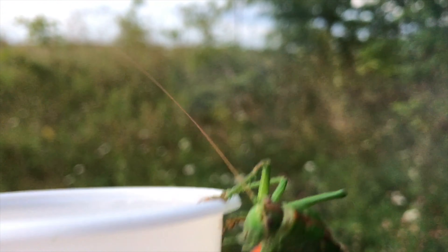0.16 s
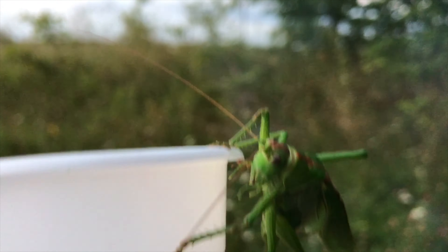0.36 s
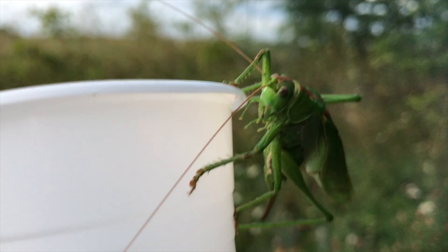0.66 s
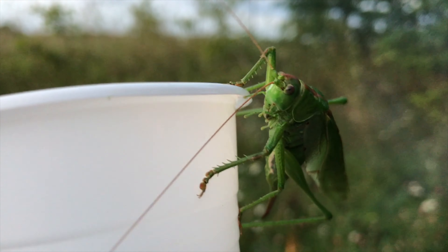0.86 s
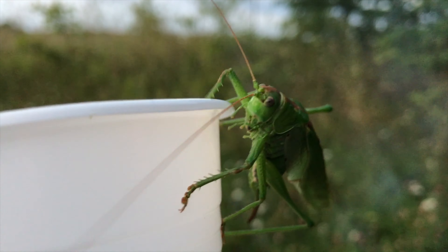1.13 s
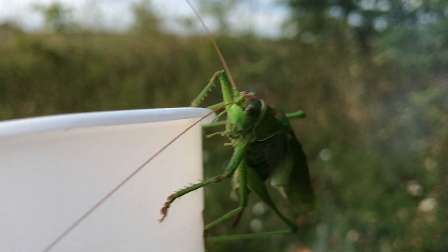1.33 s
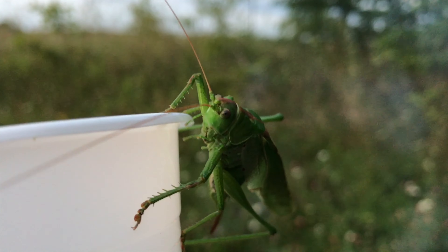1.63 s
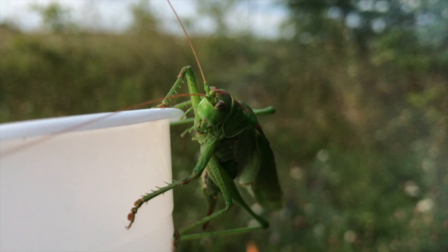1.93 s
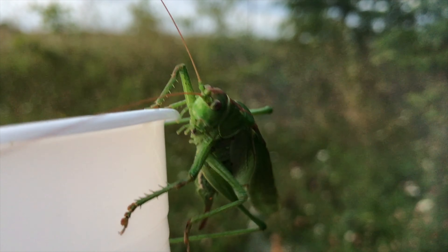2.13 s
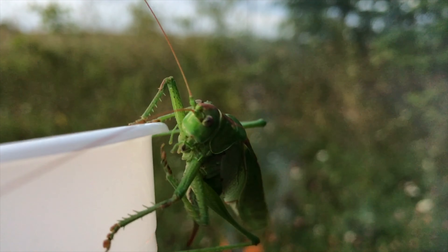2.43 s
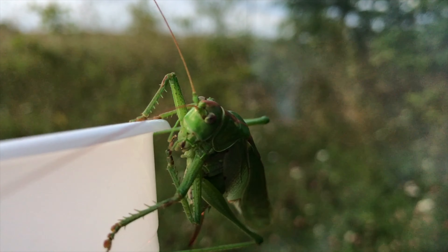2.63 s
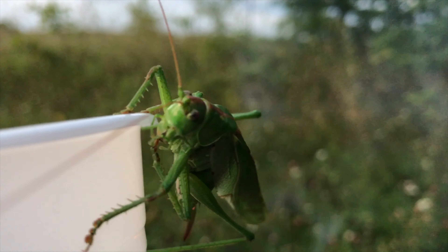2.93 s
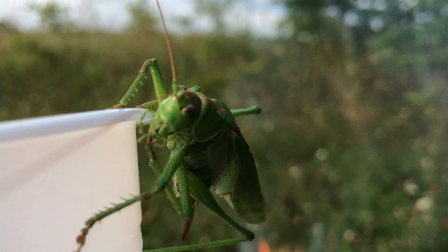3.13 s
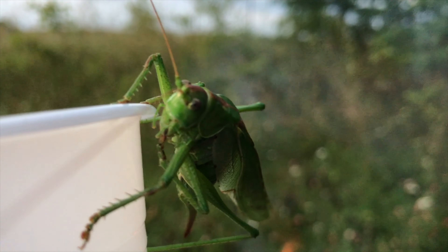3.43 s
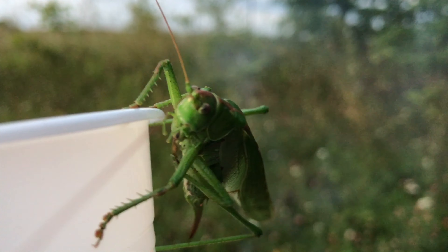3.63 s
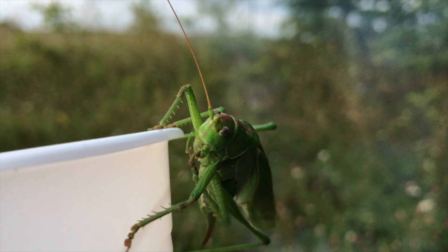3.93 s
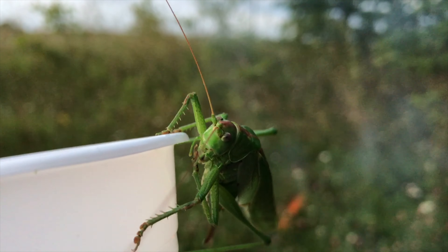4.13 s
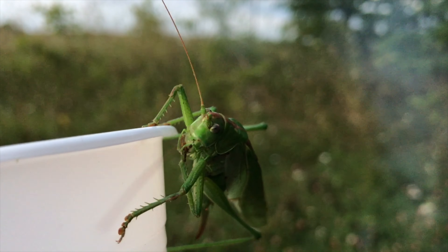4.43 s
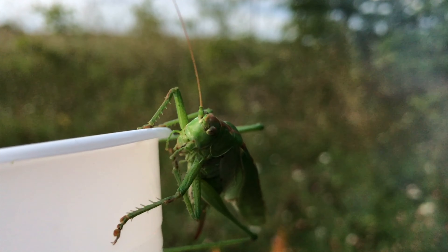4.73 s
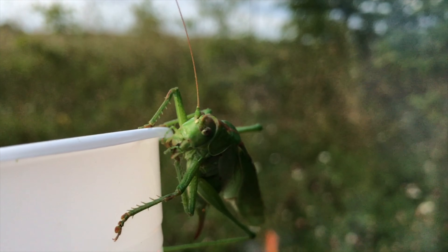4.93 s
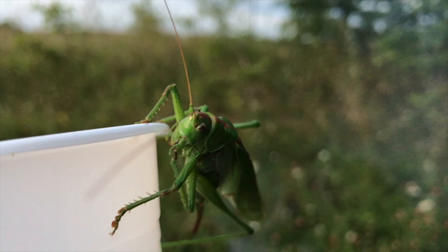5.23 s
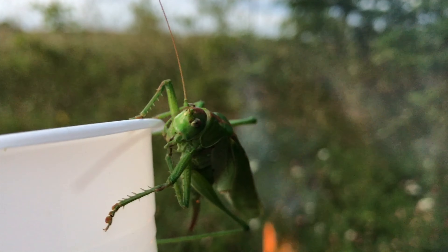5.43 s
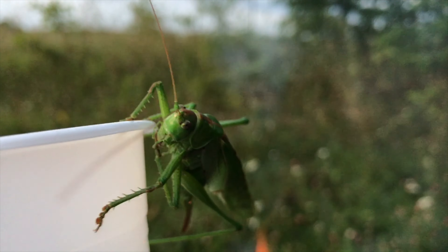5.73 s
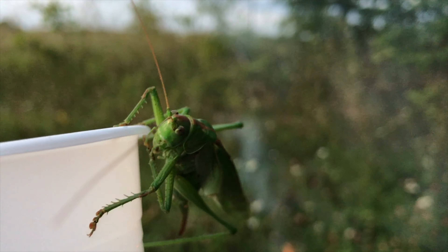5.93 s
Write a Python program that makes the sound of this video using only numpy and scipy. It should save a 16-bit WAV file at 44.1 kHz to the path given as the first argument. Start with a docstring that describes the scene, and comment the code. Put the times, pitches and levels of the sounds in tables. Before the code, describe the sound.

Close stereo pickup in an open meadow. Two bush-crickets rasp in dry, bright, very high buzzes, about eighteen to twenty pulses a second, left and right. The left stops after half a second, leaving the steady right one and a softer third, then returns just after two seconds. A bird churrs in the first second or so and faintly at the end, over quiet traffic rumble.

```python
"""Summer meadow: two bush-crickets sing, one to each side, drifting in and out of step; for a while the left
one sings only softly. File teeth knock the wing resonances; short crackling clicks lie below the buzz. Far
singers are a hiss coloured like wings; a bird churrs in falling sine pulses with echoes from trees. Distant
traffic rumbles in noise bands that also hold the hiss of the grass; engine hums are wavering sines."""
import sys
import numpy as np
from scipy import signal
from scipy.fft import rfft, irfft, next_fast_len
from scipy.io import wavfile
from scipy.ndimage import uniform_filter1d

SR = 44100
rng = np.random.default_rng(int(sys.argv[2]) if len(sys.argv) > 2 else 0)


def persist_wave(psi):
    """Save psi, clipped to +-1, as 16-bit WAV."""
    counts = np.round(np.clip(psi, -1, 1) * 32767).astype(np.int16)
    wavfile.write(sys.argv[1], SR, np.atleast_2d(counts).T)


N = 267687


def from_db(db):
    """Decibels to amplitude gain."""
    return 10 ** (np.asarray(db) / 20)


def rms_one(x):
    """Scale to unit rms."""
    return x / np.sqrt(np.mean(x ** 2) + 1e-20)


def in_time(rows):
    """Columns of a curve table, interpolated at every sample."""
    s, *columns = np.transpose(rows)
    return [np.interp(np.arange(N) / SR, s, column) for column in columns]


def at_hz(points, hz):
    """A spectrum table read on a log-frequency axis."""
    table_hz, value = np.transpose(points)
    return np.interp(np.log(hz + 1), np.log(table_hz + 1), value)


def drift(rate_hz):
    """Slow noise of rms 1: white noise through a double pole, run at SR / 40."""
    step, run_in = 40, 2000
    r = np.exp(-2 * step * np.pi * rate_hz / SR)
    white = rng.standard_normal(N // step + run_in + 2)
    slow = signal.lfilter([1], [1, -2 * r, r * r], white)[run_in:]
    return np.interp(np.arange(N) / step, np.arange(len(slow)), rms_one(slow))


def cut(x, hz, kind, order):
    """Butterworth filter."""
    return signal.sosfilt(signal.butter(order, hz, kind, fs=SR, output="sos"), x + 1e-18)


def resonance(x, hz, width_hz):
    """A two-pole resonance applied twice, for steep flanks; gain 1 on top."""
    r = np.exp(-np.pi * width_hz / SR)
    section = [(1 - r * r) / 2, 0, (r * r - 1) / 2, 1, -2 * r * np.cos(2 * np.pi * hz / SR), r * r]
    return signal.sosfilt([section, section], x + 1e-18)


def strikes(at_s, sizes):
    """A train of single-sample knocks."""
    at = np.round(at_s * SR).astype(int)
    heard = (at >= 0) & (at < N)
    return np.bincount(at[heard], sizes[heard], N)


def beats(marks, usual_s):
    """Rows for every beat: the marked ones, and even ones between them at about the usual gap."""
    marks = np.array(marks)
    steps = np.maximum(np.round(np.diff(marks[:, 0]) / usual_s), 1)
    counted = np.cumsum(np.r_[0, steps])
    every = np.arange(counted[-1] + 1)
    return np.transpose([np.interp(every, counted, column) for column in marks.T])


# Traffic rumble and grass hiss. Each row: frequency in Hz, relative level in dB per Hz.
FIELD_SPECTRUM = [(12, -31), (20, 8), (32, -7), (59, 1.5), (129, -2.5), (161, -4), (224, -5.5),
                  (299, -10.5), (382, -11.5), (581, -17.5), (1500, -22), (2740, -28.5), (3430, -26),
                  (4000, -23), (5200, -42), (8800, -120)]
# Stereo likeness of the field. Each row: frequency in Hz, left-right correlation (0 to 1).
FIELD_LIKENESS = [(30, 0.93), (130, 0.79), (290, 0.6), (640, 0.39), (1400, 0.25), (3100, 0.014)]
# Swell and fade of the field. Each row: time in seconds, gain in dB.
FIELD_SWELL = [(0, 1), (2, -0.4), (4.2, 0.5), (6.07, 0.5)]
FIELD_BEFORE_SWELL_DB = -50.5


def field(patchy_db):
    """Traffic rumble and grass hiss: half-octave stereo noise bands, each flickering, under one swell."""
    out, edges_hz = 0, 18 * 2 ** np.arange(0, 8.6, .5)
    white = rng.standard_normal((2, 2, N + SR))   # one second of run-in
    for k, (low_hz, high_hz) in enumerate(zip(edges_hz, edges_hz[1:])):
        # neighbouring bands use independent noise
        band = signal.butter(2, [low_hz, high_hz], "band", fs=SR, output="sos")
        mid, side = signal.sosfilt(band, white[k % 2])[:, SR:]
        hz = np.sqrt(low_hz * high_hz)
        alike = at_hz(FIELD_LIKENESS, hz)
        gain = from_db(at_hz(FIELD_SPECTRUM, hz) + patchy_db * drift(18.0))
        out = out + gain * (np.sqrt(1 + alike) * mid + np.sqrt(1 - alike) * side * [[1], [-1]])
    swell_db, = in_time(FIELD_SWELL)
    return from_db(swell_db) * from_db(FIELD_BEFORE_SWELL_DB) * rms_one(out)


# Far engine hums, one list per hum. Each row: time in seconds, pitch in Hz, rms level in dB.
ENGINE_HUMS = [
    [(0, 250.5, -61), (.08, 236.6, -54), (.16, 219, -71)],
    [(.95, 253.8, -67), (1.15, 257, -58.5), (1.55, 254, -55), (1.7, 255.6, -72), (2.3, 259.2, -62.5),
     (3.2, 257.2, -67.5), (3.5, 253, -95)],
    [(1.5, 231, -66), (1.65, 229.1, -58), (2.2, 235.8, -58), (2.65, 235, -60.5), (3.1, 235.6, -63.5),
     (3.7, 230.2, -65), (4.0, 226.4, -66.5), (4.5, 225, -62.5), (5.0, 215.6, -62.5), (5.4, 212, -72)],
    [(1.6, 142, -80), (1.9, 137, -62), (2.6, 135.2, -79), (2.9, 137, -61)],
]


def engine_hums(waver_db, waver_hz):
    """Thin sine tones that waver in level and pitch on their way across the field."""
    out, fade_s, silent_db = np.zeros(N), .1, -100
    for rows in ENGINE_HUMS:
        (first_s, first_hz, _), (last_s, last_hz, _) = rows[0], rows[-1]
        fade_in = (first_s - fade_s, first_hz, silent_db)
        fade_out = (last_s + fade_s, last_hz, silent_db)
        hz, level_db = in_time([fade_in] + list(rows) + [fade_out])
        gain = np.sqrt(2) * from_db(level_db + waver_db * drift(10.3))
        turns = np.cumsum(hz + waver_hz * drift(2.36)) / SR
        out += gain * np.sin(2 * np.pi * turns)
    return out


BUZZ_LOW_HZ = 2850   # low cut of the buzz, clearing the resonances' lower skirts
# Blended resonances of many distant wings. Each row: frequency in Hz, width in Hz, relative level in dB.
FAR_WING = [(5040, 1960, -6), (7600, 4600, -14.5), (9900, 710, -14), (11100, 4400, -1.5),
            (13250, 1700, 1.5), (14900, 1400, -13)]


def far_chorus(level_db, patchy_db):
    """Many distant singers blend into a hiss: noise through wing resonances, flickering in level."""
    white = cut(rng.standard_normal((2, N)), BUZZ_LOW_HZ, "high", order=4)
    hiss = np.zeros((2, N))
    for k, (hz, width_hz, mode_db) in enumerate(FAR_WING):
        hiss += (-1) ** k * from_db(mode_db) * resonance(white, hz, width_hz)
    return from_db(level_db + patchy_db * drift(17.6)) * rms_one(hiss)


def tree_echoes(x, t60_s, level_db, first_s):
    """Dense echoes from trees across the field: decaying noise responses, different at each port."""
    t = np.arange(int(.4 * SR)) / SR
    echoes = rng.standard_normal((2, len(t))) * from_db(-60 * t / t60_s) * (t > first_s)
    echoes *= from_db(level_db) / np.sqrt(np.sum(echoes ** 2, axis=1, keepdims=True))
    return signal.fftconvolve(x[None], echoes, axes=1)[:, :N]


# Marked pulses, one list per phrase. Each row: time in seconds, pitch in Hz at the peak, peak in dB.
CHURR_PHRASES = [
    [(-.004, 2230, -49), (.398, 2210, -46.5), (.67, 2190, -49.5), (.693, 2025, -53), (1.185, 2000, -54.5),
     (1.238, 2030, -52), (1.282, 2180, -48)],
    [(5.525, 2150, -63), (5.726, 2207, -56), (5.76, 2200, -64), (5.787, 1850, -58.5), (6.018, 1980, -56),
     (6.051, 2070, -52.5)],
]
# One pulse, a note that drops away. Each row: time from the peak in ms, pitch ratio, level in dB.
CHURR_PULSE = [(-6.5, 1.09, -30), (-5.5, 1.05, -8), (-2, 1.01, -0.5), (-.5, 0.985, 0.5), (0.5, 0.878, 0.5),
               (3.5, 0.69, -10), (5.5, 0.37, -10), (5.5, 0.63, -28)]
# two gears: high and slow, low and fast
GEAR_HZ, SLOW_PULSE_S, FAST_PULSE_S = 2030, .0355, .025
PULSE_RASP = .3   # share of noisy flutter in each pulse
CHURR_TOP_HZ, ECHO_LOW_HZ = 2500, 1750   # call's upper edge; trees return mostly its high part


def churr(echo_db):
    """A bird's call: falling sine pulses in a fast even train, rasped by noise and blurred by echoes."""
    phrases = []
    for rows in CHURR_PHRASES:
        gap_s = np.where(np.array(rows)[1:, 1] > GEAR_HZ, SLOW_PULSE_S, FAST_PULSE_S)
        phrases.append(beats(rows, gap_s))
    s, hz, peak_db = np.concatenate(phrases).T
    ms, ratio, shape_db = np.transpose(CHURR_PULSE)
    t_ms = np.arange(ms[0], ms[-1], 1000 / SR)
    pitch_hz = hz * (1 + .02 * rng.standard_normal(len(s)))
    turns = np.cumsum(np.interp(t_ms, ms, ratio)) / SR * pitch_hz[:, None]
    size = from_db(peak_db + 1.3 * rng.standard_normal(len(s)))
    envelope = size[:, None] * from_db(np.interp(t_ms, ms, shape_db))
    pulses = envelope * np.sin(2 * np.pi * turns)
    flutter = rms_one(uniform_filter1d(rng.standard_normal(pulses.shape), size=60))
    call = strikes(s[:, None] + t_ms / 1000, pulses * (1 + PULSE_RASP * flutter))
    call = cut(call, CHURR_TOP_HZ, "low", order=8)
    returned = cut(call, ECHO_LOW_HZ, "high", order=4)
    return call * from_db([[.6], [-.6]]) + tree_echoes(returned, .6, echo_db, first_s=.006)


# Short clicks. Each row: time in seconds, relative peak in dB.
CLICKS = [(0.0089, -38.5), (0.0642, -57), (0.1107, -51), (0.165, -48), (0.215, -52), (0.2659, -45),
          (0.3724, -41), (2.818, -57), (2.973, -49), (3.6278, -48), (3.8235, -53), (3.872, -54),
          (4.3817, -47), (4.4293, -44), (4.7845, -50), (4.9833, -48), (5.0302, -47), (5.5298, -50),
          (5.8004, -49), (6.0467, -50)]
CLICK_LOW_HZ, CLICK_HIGH_HZ, CRACKLE_T60_S = 3050, 4200, .006


def crackling_clicks(gain_db, pan_db, crackle_db):
    """Short clicks at 3 to 4 kHz, below the buzz: band-passed impulses, each with a brief noise crackle."""
    s, peak_db = np.transpose(CLICKS)
    t = np.arange(int(CRACKLE_T60_S * SR)) / SR
    crackle = from_db(crackle_db - 60 * t / CRACKLE_T60_S) * rng.standard_normal((len(s), len(t)))
    burst = crackle + (t == 0)
    impulses = strikes(s[:, None] + t, from_db(peak_db + gain_db)[:, None] * burst)
    click = cut(impulses, [CLICK_LOW_HZ, CLICK_HIGH_HZ], "band", order=3)
    return click * from_db([[pan_db / 2], [-pan_db / 2]])


TOOTH_SLIP, SPREAD_MS = .12, .09   # file unevenness in teeth; how far apart the wing's parts snap
TAIL_T60_S, TEETH = .009, 48
CLOSING_START_MS, CLOSING_END_MS = -14, 9   # loud part of the closing stroke


def singer(strokes, cycle, wing, lead, gain_db, uneven_db, alike, tail_db, faint_left_db):
    """The scraper ticks over the file teeth; every tooth knocks the wing's resonances."""
    s, level_db, pan_db = np.transpose(strokes)
    ms, shape_db, gap_ms = np.transpose(cycle)
    grid_ms = np.linspace(ms[0], ms[-1], 400)
    passed = np.cumsum((grid_ms[1] - grid_ms[0]) / np.interp(grid_ms, ms, gap_ms))   # teeth so far
    chance = rng.standard_normal((len(s), TEETH, 2 + 3 * len(wing)))
    tooth = np.arange(TEETH) + rng.random((len(s), 1)) + TOOTH_SLIP * chance[..., 0]
    tooth_ms = np.interp(tooth, passed, grid_ms)
    # the shape is a loudness, so sparser teeth strike harder
    force = from_db(level_db[:, None] + np.interp(tooth_ms, ms, shape_db) + uneven_db * chance[..., 1])
    force *= np.sqrt(np.interp(tooth_ms, ms, gap_ms)) * (tooth < passed[-1])
    # faint parts of the cycle get their own left-right balance
    is_faint = (tooth_ms < CLOSING_START_MS) | (tooth_ms > CLOSING_END_MS)
    balance_db = faint_left_db / 2 * is_faint

    # stems and leaves scatter each knock into a short noisy tail
    fade = from_db(-120 / (TAIL_T60_S * SR))   # per sample, of power
    power = signal.lfilter([1 - fade], [1, -fade], strikes(s[:, None] + tooth_ms / 1000, force ** 2))
    rustle = rng.standard_normal((3, N))   # half shared by the ports, half their own
    tail = from_db(tail_db) * np.sqrt(power / 2) * (rustle[0] + rustle[1:])

    song = np.zeros((2, N))
    for k, (hz, width_hz, mode_db) in enumerate(wing):
        late, left, right = np.moveaxis(chance[..., 2 + 3 * k:5 + 3 * k], -1, 0)
        at_s = s[:, None] + (tooth_ms + SPREAD_MS * late) / 1000   # each part snaps on its own
        knocks = []
        # the moving wing throws each resonance unevenly at the two ports
        for own, port_db in ((left, balance_db), (right, -balance_db)):
            throw = np.sqrt(alike) + np.sqrt(1 - alike) * np.tanh(own)
            knocks.append(strikes(at_s, force * from_db(port_db) * throw))
        song += (-1) ** k * from_db(mode_db) * resonance(np.array(knocks) + tail, hz, width_hz)
    song = from_db(gain_db) * cut(song, BUZZ_LOW_HZ, "high", order=6)

    # phase between the ports, then the pan of each stroke
    size = next_fast_len(N + SR // 10)
    turn = np.exp(-1j * at_hz(lead, np.arange(size // 2 + 1) * SR / size))
    ports = np.array([song[0], irfft(rfft(song[1], size) * turn, size)[:N]])
    side = from_db(np.interp(np.arange(N) / SR, s, pan_db) / 2)
    return ports * [side, 1 / side]


# Marked strokes. Each row: loudest tooth in seconds, relative level in dB, left over right in dB.
SOFT_SONG = [(.503, -36, 1), (.804, -36.5, 2), (1.105, -35.5, -1), (1.406, -31.5, 0), (1.708, -33.5, -2),
             (2.061, -30.5, 3)]
SOFT_STROKE_S = .0503


def soft_cricket():
    """The left singer singing softly while its loud strokes pause: evenly filled-in strokes on its own cycle
    and wing."""
    strokes = beats(SOFT_SONG, SOFT_STROKE_S)
    return singer(strokes, LEFT_CYCLE, LEFT_WING, LEFT_LEAD, gain_db=25,
                  uneven_db=0.5, alike=0.36, tail_db=3.5, faint_left_db=-16)


# Every wing stroke. Each row: loudest tooth in seconds, relative level in dB, left over right in dB.
LEFT_SONG = [(0.0053, -18.5, 3), (0.0577, -17.5, 1), (0.1091, -19, 6.5), (0.161, -16.5, -1),
             (0.214, -19.5, 4.5), (0.2654, -17, 1), (0.3188, -19, 6), (0.3722, -16.5, 2.5),
             (0.4263, -19, 4), (0.4845, -25, 10), (2.1135, -27, 7), (2.1629, -25, 1), (2.2138, -24.5, 1.5),
             (2.2632, -24.5, 3), (2.3142, -23.5, 3), (2.3666, -23.5, 2), (2.4195, -23.5, 3),
             (2.4675, -26, 6), (2.5175, -20, 6), (2.5696, -20, -2), (2.6162, -21.5, 0), (2.6674, -22.5, 3),
             (2.7195, -24, 6), (2.7668, -24, 2), (2.8212, -21.5, 4), (2.868, -21, 3), (2.9228, -23, 4),
             (2.9707, -21.5, 4), (3.023, -22.5, 5), (3.0708, -20.5, 2), (3.1217, -21, 3),
             (3.17, -17.5, 3.5), (3.2234, -21.5, 1), (3.2732, -19.5, 1), (3.3226, -22.5, 1),
             (3.373, -21.5, 5), (3.4219, -21, 4), (3.4738, -22.5, 6), (3.5246, -22, 3), (3.5745, -21.5, 1),
             (3.6238, -24, 5), (3.674, -21.5, 3.0), (3.7252, -21, 3), (3.772, -21.5, 6.5),
             (3.8274, -18, 2.5), (3.8728, -20, 1), (3.9246, -22, 8), (3.974, -19.5, 2.5), (4.0249, -21, 6),
             (4.0748, -23.5, 7), (4.1256, -21.5, 3), (4.1765, -21.5, 4.0), (4.2272, -23.5, 7),
             (4.2765, -20, 4), (4.3257, -20.5, 3), (4.3755, -19.5, 3), (4.4258, -14.5, -2),
             (4.4735, -20, 3.5), (4.5258, -23, 7), (4.5755, -20.5, 5), (4.6265, -22, 9.5),
             (4.675, -21.5, 4.5), (4.725, -20.5, 5), (4.777, -20.5, 4), (4.8295, -21, 4), (4.8755, -21, 5),
             (4.93, -21.5, 3), (4.9795, -20.5, 2.5), (5.025, -20, 4.5), (5.0815, -20, 3), (5.1315, -20, -3),
             (5.18, -24.5, 10), (5.2343, -30.5, 13), (5.2836, -19, 3.0), (5.3349, -21.5, 0),
             (5.3852, -22, 2.5), (5.4345, -21, 4), (5.4888, -20, 3.5), (5.5401, -21, 0.5),
             (5.5909, -20.5, 3), (5.6432, -22, 5), (5.6945, -22.5, 7), (5.7442, -21, 5.5),
             (5.7939, -18.5, 2), (5.8456, -22, 6), (5.8959, -18, 2), (5.9456, -22, 8), (5.9953, -20, 3.5),
             (6.0455, -18.5, 0.5)]
# Closing stroke and faint opening. Each row: ms from the loudest tooth, level in dB, tooth gap in ms.
LEFT_CYCLE = [(-28, -37, 1.2), (-15, -13.5, 1.7), (-9, -8, 2.3), (-3, -5, 2.7), (2, -0.5, 2.9),
              (6, -2.5, 2.4), (7.5, -8.5, 3.1), (10, -10.5, 1.3), (13.5, -17, 1.5), (24.5, -22, 2.9)]
# Wing resonances. Each row: frequency in Hz, width in Hz, relative level in dB.
LEFT_WING = [(3310, 310, -38.5), (4930, 720, -30), (5300, 1100, -32), (6830, 1600, -18), (7590, 350, -4),
             (8250, 180, 3), (9400, 780, 3), (10500, 1000, 2), (10770, 1040, 1), (12050, 930, -7),
             (14200, 2100, -17), (16200, 1300, -29)]
# Left port's lead over the right. Each row: frequency in Hz, phase in radians.
LEFT_LEAD = [(5000, -.2), (7300, -2.3), (9500, -3.5), (15000, -3)]


def left_cricket():
    """The left singer's loud strokes: its own file rhythm and wing, with a pause while it sings softly."""
    return singer(LEFT_SONG, LEFT_CYCLE, LEFT_WING, LEFT_LEAD, gain_db=25,
                  uneven_db=1.16, alike=0.93, tail_db=1.5, faint_left_db=2)


# Every wing stroke. Each row: loudest tooth in seconds, relative level in dB, left over right in dB.
RIGHT_SONG = [(-0.0145, -15, -5.5), (0.0397, -20.5, 1), (0.0964, -20.5, -4), (0.1501, -22.5, 3),
              (0.2034, -20.5, -4), (0.2581, -22.5, -4), (0.3108, -24.5, -6), (0.363, -23.5, -3),
              (0.4223, -21.5, -7), (0.4792, -20, -2), (0.5365, -20.5, -2.5), (0.5925, -20, -3),
              (0.6455, -20, -3), (0.6985, -20, -2), (0.752, -20, -2.0), (0.8065, -20, 0),
              (0.863, -19, -2.5), (0.918, -20.5, -3), (0.9725, -20, 0), (1.0276, -19, 0), (1.0828, -20, 0),
              (1.1394, -20, -2.0), (1.196, -20.5, -1), (1.2495, -20.5, -1), (1.305, -21.5, -2),
              (1.36, -19.5, -3.5), (1.416, -19.5, -2.5), (1.4705, -21, 0), (1.525, -20.5, -1),
              (1.58, -20.5, -1), (1.635, -21, -1.5), (1.6905, -19.5, 0), (1.7457, -19.5, -0.5),
              (1.8013, -20.5, -2), (1.856, -20, -2.0), (1.9121, -22, -1), (1.9658, -20.5, -3),
              (2.0214, -20.0, -3), (2.0781, -21.5, -3.5), (2.1312, -21, -3), (2.1874, -20, -2),
              (2.24, -20, 0), (2.2957, -20.5, -2.5), (2.3523, -20.5, -2), (2.408, -19.5, -2),
              (2.4609, -20, -2), (2.5153, -24, -9), (2.5677, -21.5, 3), (2.624, -19.5, -2),
              (2.6794, -19.5, -2), (2.7343, -20, -3), (2.7907, -19.5, -1), (2.8441, -22, -1),
              (2.8975, -21, -2.0), (2.9503, -20, -2.0), (3.0062, -20.5, -3), (3.0601, -21, 0),
              (3.1125, -20, -2), (3.1667, -22, -8), (3.2235, -20, 0), (3.2797, -20.5, 1),
              (3.3349, -19.5, 0), (3.3896, -21.0, -4), (3.4439, -20.5, -3), (3.4986, -21, -3),
              (3.5523, -22, -2), (3.6075, -20, -3.0), (3.6593, -21.5, -1), (3.7145, -21, -3),
              (3.7704, -21.5, -8), (3.8244, -22, 1), (3.8833, -21, -1), (3.9377, -25, -9),
              (3.9928, -21.5, -1), (4.0479, -22, -5.5), (4.1024, -20.5, -2.0), (4.156, -20.5, -1),
              (4.2106, -20.0, -3), (4.2642, -21, -2.0), (4.3184, -20, -1), (4.371, -21, -4),
              (4.4316, -32, -6), (4.4812, -19, 1), (4.5339, -20, -4), (4.589, -21.5, -2),
              (4.6419, -19.5, -4), (4.6968, -23, -5), (4.7501, -21, -3), (4.805, -21, -2),
              (4.8579, -22, -4), (4.9128, -21.5, 0), (4.9661, -20, -1), (5.0215, -22.5, -8),
              (5.0752, -21, 0), (5.1294, -21, 1), (5.1846, -21.5, -4), (5.2388, -19, -1), (5.2929, -21, -2),
              (5.3476, -19.5, 0), (5.4013, -21.5, -1), (5.4575, -22.5, -3), (5.5129, -19.5, 0),
              (5.5677, -20, -1), (5.6241, -21.5, -1.5), (5.679, -20.5, -5), (5.7323, -20, -2),
              (5.7852, -21, -2), (5.8435, -18.5, 0), (5.8944, -21.5, 0), (5.9518, -21.5, -4.5),
              (6.0061, -20, -2), (6.0625, -20, 1.5)]
# Closing stroke and faint opening. Each row: ms from the loudest tooth, level in dB, tooth gap in ms.
RIGHT_CYCLE = [(-30, -30.5, 1.2), (-20, -18, 1.5), (-14, -11, 1.9), (-7, -6.5, 2.2), (0, -3, 2.4),
               (4.5, -3.5, 2.4), (7.5, -6.5, 1.8), (10, -9.5, 1.2), (16.5, -20.5, 1.1), (25, -23.5, 1.1)]
# Wing resonances. Each row: frequency in Hz, width in Hz, relative level in dB.
RIGHT_WING = [(3190, 410, -47.5), (4635, 300, -28), (5460, 540, -27.5), (6720, 1250, -19.5),
              (7180, 305, -6), (7717, 410, -0.5), (9054, 1480, -2), (10500, 1370, -3), (11370, 880, -5.5),
              (11740, 2600, -15), (14500, 1300, -24.5), (15400, 1000, -20)]
# Left port's lead over the right. Each row: frequency in Hz, phase in radians.
RIGHT_LEAD = [(4400, 0), (6900, -1.1), (7500, -2.3), (11000, -1.9), (15000, -3)]


def right_cricket():
    """The right singer: slightly slower strokes on its own file and wing."""
    return singer(RIGHT_SONG, RIGHT_CYCLE, RIGHT_WING, RIGHT_LEAD, gain_db=27,
                  uneven_db=1.0, alike=0.6, tail_db=0.93, faint_left_db=0.5)


def scene():
    """Field and traffic, far singers, the bird, clicks and the near crickets, summed in stereo."""
    background = field(patchy_db=1.5) + engine_hums(waver_db=3.0, waver_hz=2.1)
    background += far_chorus(level_db=-50.5, patchy_db=5.5)
    bird = churr(echo_db=-.5)
    clicks = crackling_clicks(gain_db=21, pan_db=10.5, crackle_db=-10)
    crickets = soft_cricket() + left_cricket() + right_cricket()
    return background + bird + clicks + crickets


def record(dry):
    """Smooth rounding of the highest peaks, then a steep elliptic low-pass."""
    ceiling, cutoff_hz = .95, 15760
    rounded = dry / (1 + (dry / ceiling) ** 4) ** .25
    return signal.sosfilt(signal.ellip(12, .5, 62, cutoff_hz, fs=SR, output="sos"), rounded)


dry = scene()
out = record(dry)
persist_wave(out)
```